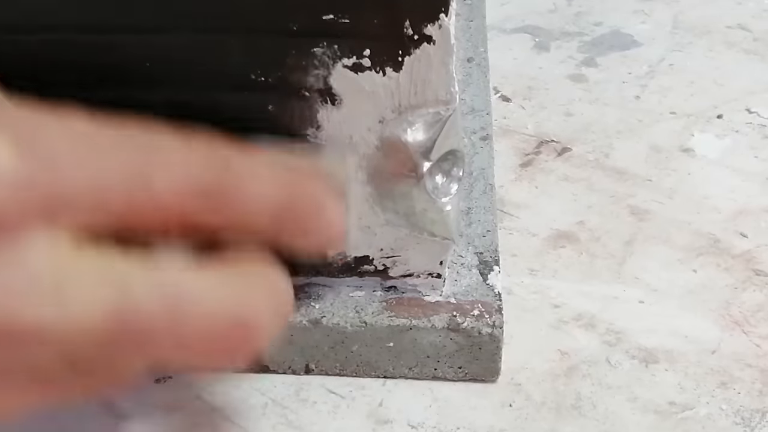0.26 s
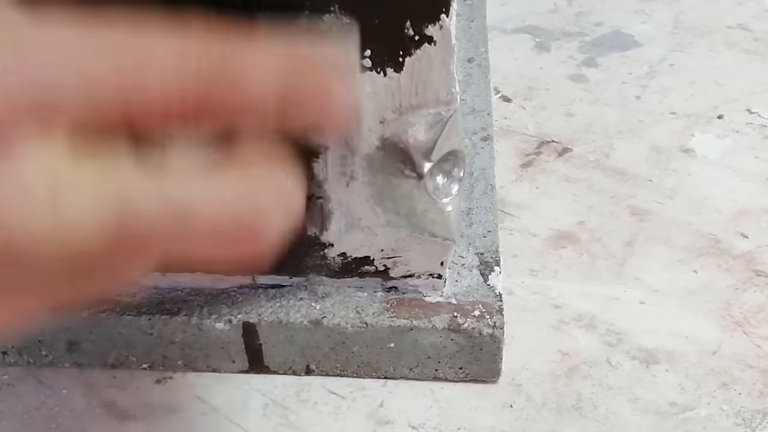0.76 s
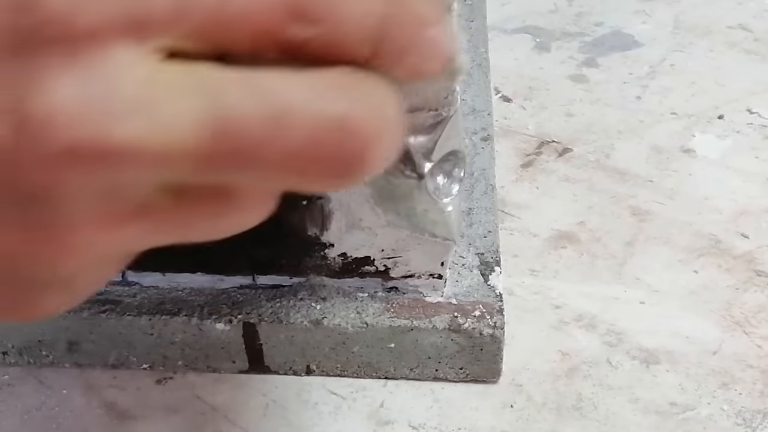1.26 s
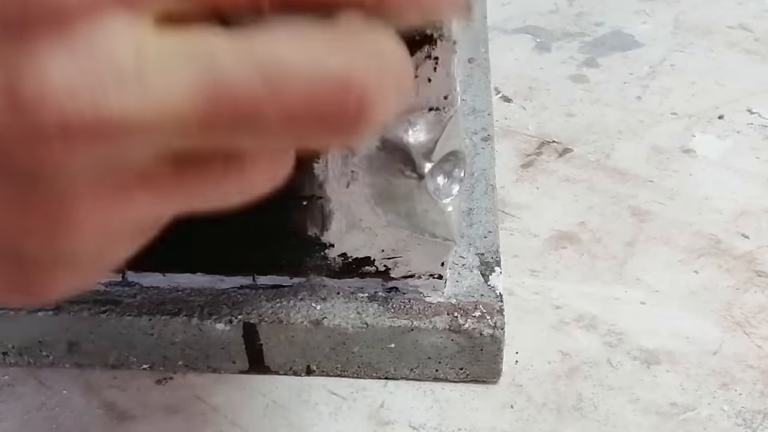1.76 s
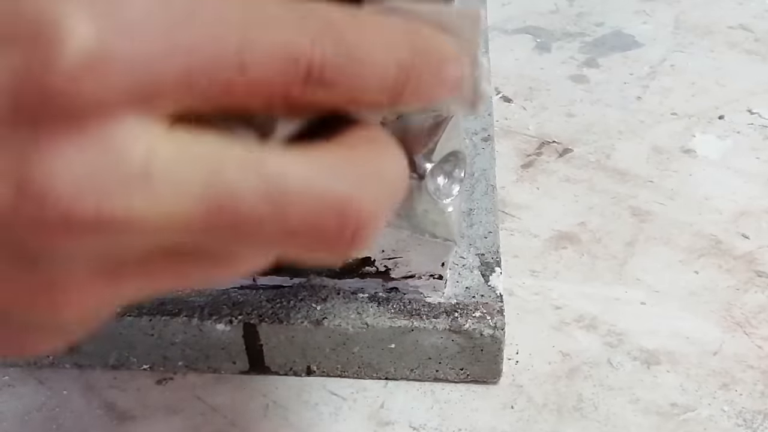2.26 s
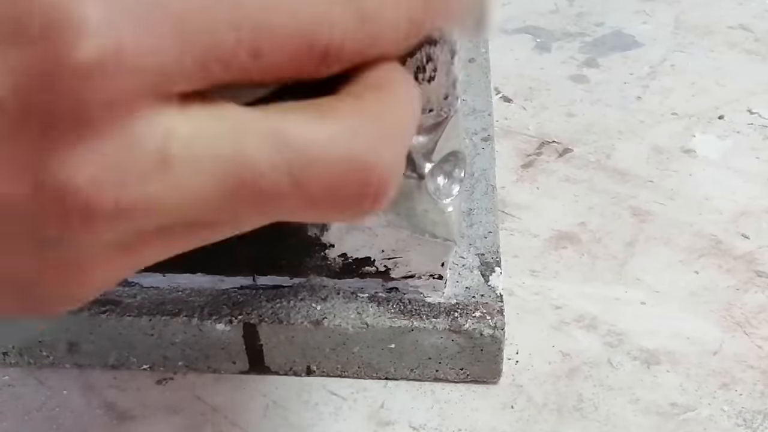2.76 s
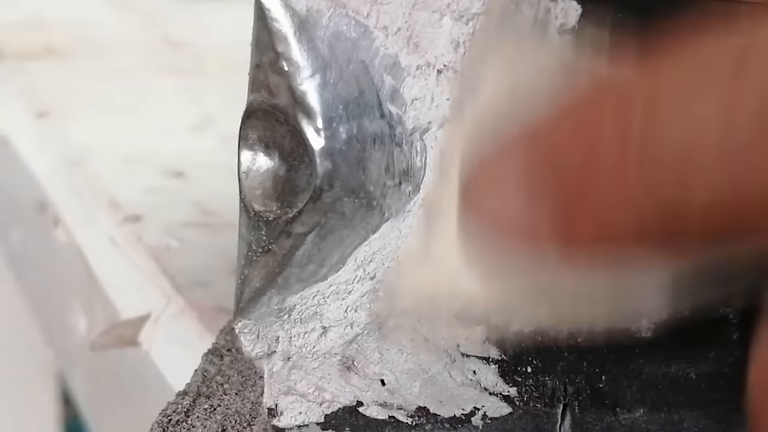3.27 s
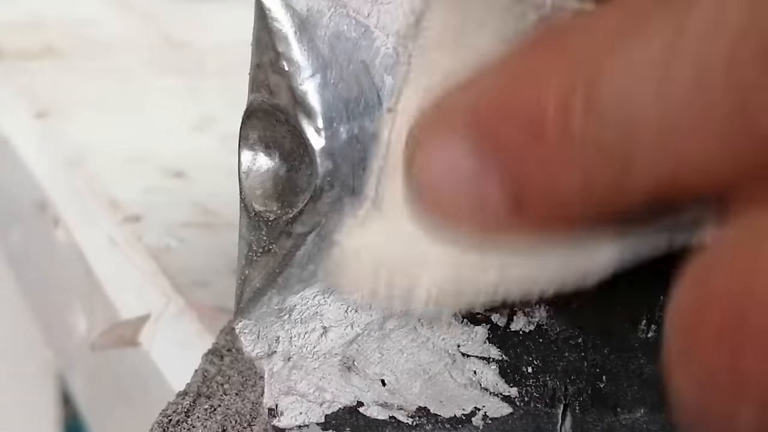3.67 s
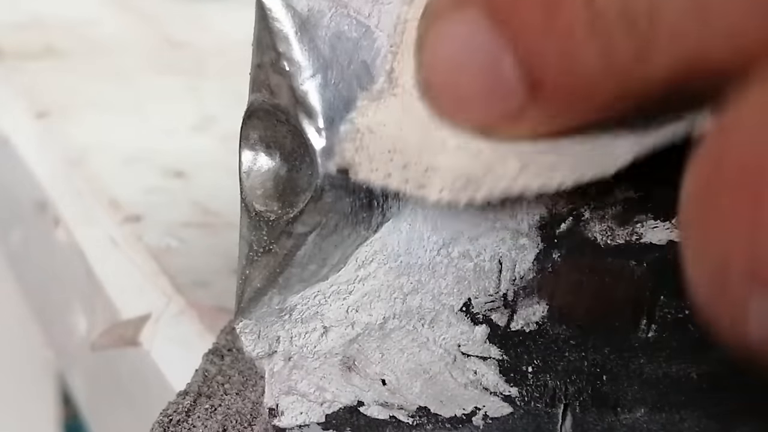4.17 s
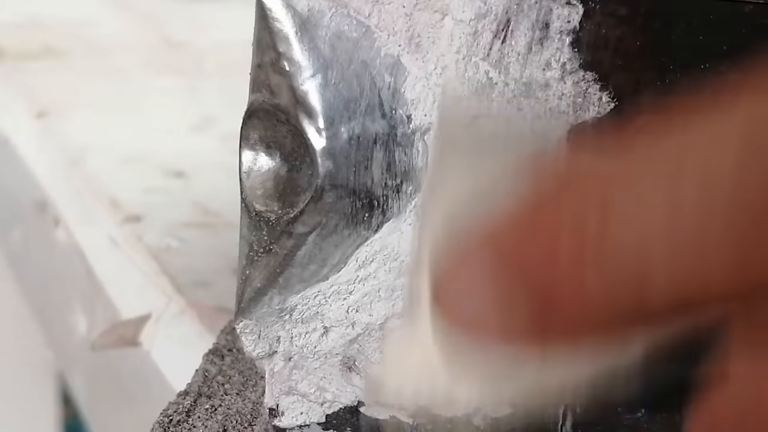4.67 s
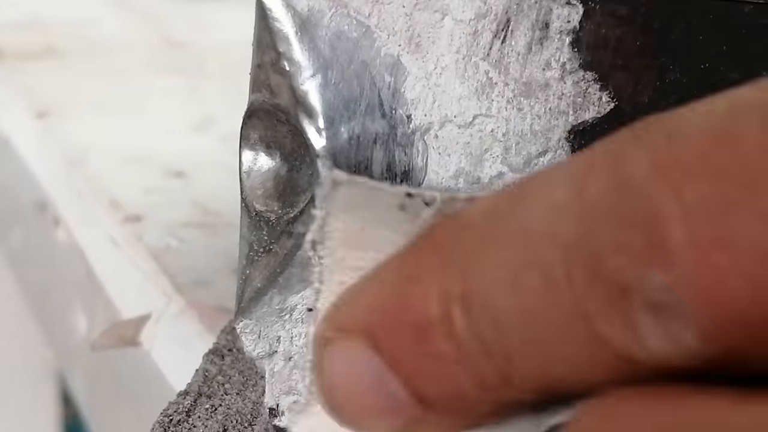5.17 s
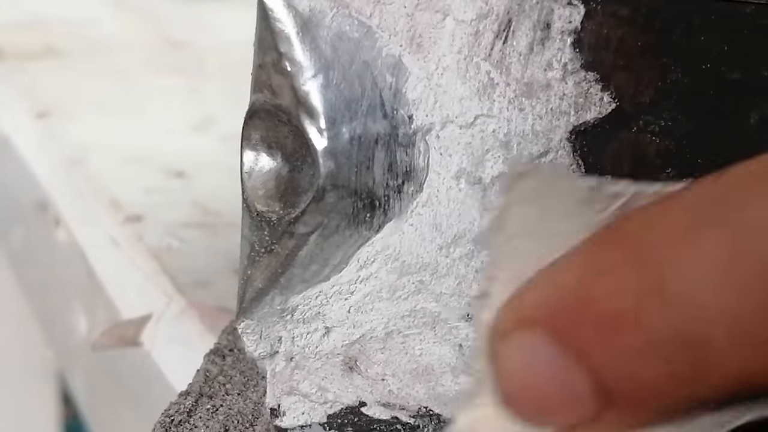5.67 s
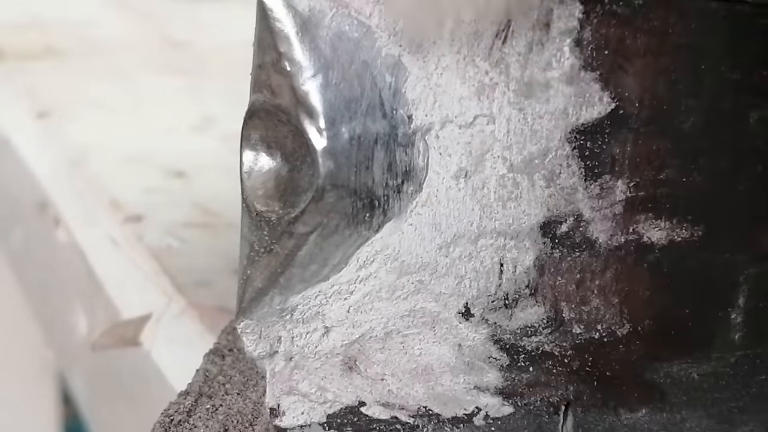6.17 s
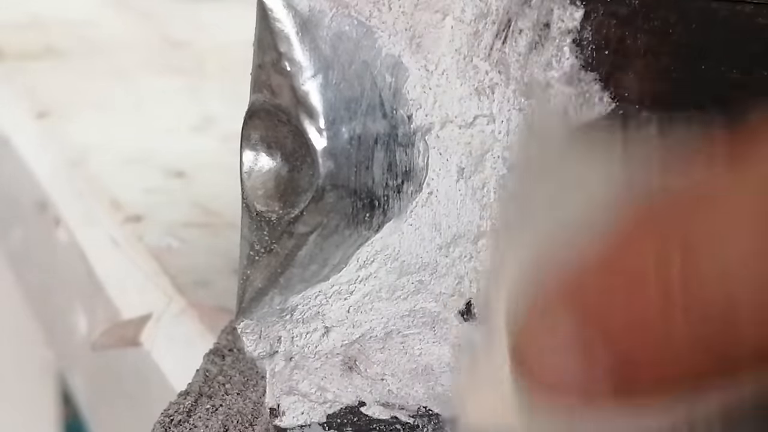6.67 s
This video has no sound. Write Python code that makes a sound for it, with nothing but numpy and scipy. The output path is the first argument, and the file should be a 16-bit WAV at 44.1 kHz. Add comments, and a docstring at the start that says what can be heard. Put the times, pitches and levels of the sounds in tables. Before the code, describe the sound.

Rapid, raspy rubbing of a pad on a painted cement slab, with grains snapping, growing louder and closer partway through.

```python
"""Scrubbing painted cement

Strokes of a cloth pad on rough painted cement follow one another some thirty times a second, close to a two-
port microphone. Each stroke is a burst of friction noise from fibres catching on grit. Loose grains snap,
fingers scuff, the slab hums and the bench rumbles. The rub changes colour as the microphone comes nearer at
about three seconds, then as the pad briefly crosses bare metal and ends along the rim of the paint."""
import sys
import numpy as np
from scipy import signal
from scipy.fft import rfft, irfft, next_fast_len
from scipy.io import wavfile
from scipy.ndimage import uniform_filter1d

SR = 44100
rng = np.random.default_rng(int(sys.argv[2]) if len(sys.argv) > 2 else 0)


def materialize(psi):
    """Save the field psi as 16-bit PCM at rate SR to the path in sys.argv[1].

    A 1-D psi becomes a single channel; in a 2-D psi each row is a channel.
    """
    bounded = np.clip(np.atleast_2d(psi).T, -1, 1)
    quanta = np.round(bounded * 32767).astype(np.int16)
    wavfile.write(sys.argv[1], SR, quanta)


N = 304731

# Each row: time in seconds, bench rumble in dB, left minus right in dB for all the low sounds.
BENCH = [(0, -69, -4), (.52, -66.5, 0.5), (1.0, -81, -2), (1.23, -69, -2.5), (1.45, -74.5, -2.5),
         (2.79, -77.5, -1), (2.9, -68, -6.5), (3.44, -65, -10), (4.0, -67.5, -8.5), (4.81, -67, -8),
         (5.7, -72.5, -7), (6.3, -59.5, -7), (6.5, -69.5, -5), (6.91, -68, -6.5)]


def amp(db):
    """Amplitude ratio of a level in decibels."""
    return 10 ** (np.asarray(db) / 20)


def unit_rms(x):
    """Normalisation to a mean power of one."""
    return x / np.sqrt(np.mean(x ** 2) + 1e-20)


def at_frequency(points, hz):
    """Interpolation on a logarithmic frequency axis."""
    f, value = np.transpose(points)
    return np.interp(np.log(hz + 1), np.log(f + 1), value)


def curves(rows):
    """Linear interpolation of each column over the times in the first."""
    times, *columns = np.transpose(rows)
    return [np.interp(np.arange(N) / SR, times, column) for column in columns]


def filtered(x, gain_of_hz):
    """Linear filtering: the spectrum is multiplied by a frequency response."""
    size = next_fast_len(N)
    return irfft(rfft(x, size) * gain_of_hz(np.fft.rfftfreq(size, 1 / SR)), size)[..., :N]


def pan(pan_db):
    """Constant-power panning: left and right gains for a level difference."""
    ratio = amp(pan_db)
    return np.array([ratio, np.ones_like(ratio)]) * np.sqrt(2 / (1 + ratio ** 2))


def add(mix, start_s, sound):
    """Superposition of a sound on the mix, trimmed at both ends."""
    at = round(start_s * SR)
    sound = sound[..., max(-at, 0):]
    part = mix[..., max(at, 0):][..., :sound.shape[-1]]
    part += sound[..., :part.shape[-1]]


def noise_pair(correlation):
    """Partial coherence: two white noises that share a component."""
    a, b = rng.standard_normal((2, N))
    return np.array([a, correlation * a + np.sqrt(1 - correlation ** 2) * b])


def resonate(x, hz, width_hz):
    """Resonance by heterodyning: hz is shifted to zero, smoothed twice and shifted back."""
    carrier = np.exp(2j * np.pi * np.cumsum(hz * np.ones(N)) / SR)
    pole = np.exp(-np.pi * width_hz / SR)
    return unit_rms((carrier * signal.lfilter([1], [1, -2 * pole, pole * pole], x / carrier)).real)


def swells(rows):
    """Incoherent addition: smooth swells sum in power to give one gain."""
    power = np.zeros(N)
    for centre_s, length_ms, db in rows:
        add(power, centre_s - length_ms / 2000, (amp(db) * np.hanning(int(length_ms * SR / 1000))) ** 2)
    return np.sqrt(power)


def waver(depth_db, smooth_s=0.044):
    """Amplitude modulation by a slow random gain."""
    size = int(smooth_s * SR)
    drift = uniform_filter1d(uniform_filter1d(rng.standard_normal(N), size), size)
    return unit_rms(amp(depth_db * unit_rms(drift)))


def hiss(level_db=-70.5):
    """Stationary noise: a faint hiss, almost uncorrelated between the channels."""
    # Each row: frequency in Hz, relative spectral level in dB.
    spectrum = [(290, -6), (500, -17), (800, -10), (3000, -16.5), (8000, -4), (11000, -11), (15600, -15)]
    return amp(level_db) * unit_rms(filtered(noise_pair(0.084), lambda hz: amp(at_frequency(spectrum, hz))))


def room(x):
    """Reverberation: sparse echoes of random sign, the treble dying first."""
    # Each row: frequency in Hz, time to decay by 60 dB in seconds.
    decay_times = [(1000, 0.4), (4000, 0.11), (8000, 0.094), (15000, 0.1)]
    echoes = np.zeros((2, SR // 2))
    arrivals = np.arange(120, SR // 2 - 20, 20) + rng.integers(0, 20, (2, (SR // 2 - 121) // 20))
    np.put_along_axis(echoes, arrivals, rng.choice([-1., 1.], arrivals.shape), 1)
    hz, t, spectra = signal.stft(echoes, SR, nperseg=128)
    decay = amp(-60 * t / at_frequency(decay_times, hz)[:, None])
    tail = signal.istft(spectra * decay, SR, nperseg=128)[1]
    return signal.fftconvolve(x, tail / np.linalg.norm(tail[0]), axes=1)[:, :N]


def bench_rumble(level_db):
    """Structure-borne sound: the bench rumbles beneath the slab as low, wavering noise."""
    # Each row: frequency in Hz, relative spectral level in dB.
    spectrum = [(12, -20), (30, -5), (100, 0), (280, -3), (500, -18), (900, -60)]
    gain = amp(level_db) * waver(depth_db=3)
    return gain * unit_rms(filtered(noise_pair(0.3), lambda hz: amp(at_frequency(spectrum, hz))))


def slab_hum():
    """Forced vibration: three low modes of the slab hum, and swell as the hand bears down."""
    # Each row: mode frequency in Hz, width in Hz.
    modes = [(285.2, 43.5), (143.7, 16), (70.4, 13.5)]
    # Each row: time in seconds, then each mode's level between presses in dB.
    resting = [(0, -74.5, -93, -84), (1.3, -80.5, -95, -81.5), (2.75, -95, -92, -78),
               (2.9, -70.5, -68, -78), (3.7, -63.5, -88, -80), (4.2, -68, -78, -78), (4.9, -64, -77, -72),
               (5.1, -86, -82, -75), (5.8, -80, -82, -74), (6.0, -76, -78, -80), (6.91, -70, -81, -80)]
    # Each row: centre in seconds, length in ms, then each mode's level in dB.
    presses = [(.04, 80, -70, -76, -91), (.35, 100, -85, -72, -81), (.5, 80, -68, -75, -84),
               (.88, 150, -74, -86, -73), (1.23, 70, -60, -68, -84), (1.83, 100, -66, -93, -79),
               (2.71, 80, -70, -79, -88), (3.05, 201, -61, -64, -82), (3.19, 160, -69, -64, -63.5),
               (3.35, 83.33, -56.5, -82, -75), (3.58, 140, -57, -85, -71), (3.77, 60, -52, -72, -73),
               (3.85, 70, -52.5, -73, -67), (4.1, 100, -66, -73, -69), (4.44, 97.2, -56.5, -72, -74),
               (4.8, 200, -73, -72, -72), (4.91, 70, -62, -74, -69), (5.29, 140, -65.5, -82, -68),
               (5.92, 101.9, -55, -80, -80), (6.12, 74.07, -67, -79, -72), (6.27, 83.33, -65.5, -78, -76),
               (6.39, 74.07, -62, -65, -74), (6.5, 55.56, -66, -71, -82), (6.87, 90, -64, -78, -74)]
    gains = []
    for mode, rest_db in enumerate(curves(resting)):
        pressed = swells([(s, ms, levels[mode]) for s, ms, *levels in presses])
        gains.append(np.hypot(amp(rest_db) * waver(depth_db=3), pressed))
    return sum(gain * resonate(noise_pair(0.56), hz, width) for gain, (hz, width) in zip(gains, modes))


def fingers(brush_hz=417, width_hz=300, skirt_db=-5):
    """Sliding friction: fingers scuff and brush the slab, a dull noise band with a broad skirt."""
    # Each row: centre in seconds, length in ms, level in dB, centre frequency in Hz.
    scuffs = [(0.039, 70, -58, 424), (.11, 95, -66, 406), (.31, 50, -54.5, 445), (.39, 160, -58, 570),
              (0.519, 65, -60.5, 465), (.79, 110, -69, 450), (0.942, 75, -61, 420), (1.06, 130, -63, 394),
              (1.16, 180, -64, 400), (1.24, 60, -62.5, 348), (1.35, 125, -63, 414), (1.46, 66, -67, 375),
              (1.87, 100, -70, 386), (2.44, 115, -63, 445), (2.85, 110, -67, 467), (2.95, 110, -63.5, 524),
              (3.12, 80, -63, 380), (3.31, 40, -58, 375), (3.52, 120, -66, 543), (3.77, 80, -74, 356),
              (3.97, 190, -66.5, 520), (4.12, 140, -60.5, 556), (4.29, 150, -60.5, 462),
              (4.7, 83, -68, 485), (4.85, 80, -68, 575), (5.002, 64, -57, 636), (5.18, 70, -59, 704),
              (5.34, 120, -58.5, 634), (5.87, 130, -66, 433), (6.1, 120, -61, 625), (6.29, 70, -60, 570),
              (6.39, 43, -58, 386), (6.5, 44, -66, 382), (6.66, 100, -66, 504), (6.791, 140, -60.5, 545)]
    # Each row: time in seconds, level of the steady brushing in dB.
    brushing = [(0, -68), (.65, -70), (1.3, -69.5), (1.9, -71), (2.02, -76), (2.35, -74), (2.77, -69.5),
                (2.9, -70.5), (4.8, -69.5), (5.1, -78), (5.9, -68.5), (6.91, -69)]
    skirt = amp(skirt_db) * unit_rms(filtered(noise_pair(0.33), lambda hz: hz / (1 + (hz / 900) ** 2)))
    *_, scuff_hz = curves(scuffs)
    scuff = swells([row[:3] for row in scuffs]) * (resonate(noise_pair(0.76), scuff_hz, width_hz) + skirt)
    brush_gain = amp(curves(brushing)[0]) * waver(depth_db=4)
    return scuff + brush_gain * (resonate(noise_pair(0.39), brush_hz, width_hz) + skirt)


def grit_snaps(crack_ms=0.35, ring_ms=0.8, ring_db=-7.5, low_cut_hz=2500):
    """Impulsive excitation: a grain breaks loose with a broadband crack and a few cycles of ring."""
    # Each row: start in seconds, level before the low cut in dB, ring in Hz, left minus right in dB.
    snaps = [(0.5054, -28, 5190, -10), (0.5157, -40, 8050, 0), (0.9335, -40, 3870, -2.5),
             (0.943, -40, 3400, -3), (1.1328, -37, 7260, 1), (1.2242, -33.5, 5440, -8),
             (1.549, -41, 7500, -1), (1.8034, -41, 7700, 6), (2.131, -30, 7400, 4), (2.3266, -54, 8760, -1),
             (2.358, -44, 6860, 5), (2.438, -46, 6580, 5), (3.461, -17.5, 6100, -1),
             (3.5385, -24, 7100, -4.5), (3.5886, -28, 7160, -5), (4.0976, -25, 8800, 3),
             (4.1615, -28, 6550, 3), (4.193, -14, 8800, -14), (4.2035, -15, 6400, -7),
             (4.219, -27, 5450, -5.5), (4.8188, -26, 4250, -10), (4.827, -34, 7400, 0),
             (5.0304, -29, 9000, -18), (5.2094, -29, 7450, 7), (5.3144, -23, 3410, -15),
             (5.3994, -21.5, 7700, 12), (5.484, -25, 3450, -24), (5.4944, -32, 5400, -17),
             (5.5004, -31, 7320, -2), (5.5653, -30, 7400, 5), (5.5814, -25, 8100, -7),
             (5.5877, -22, 9000, -12), (5.657, -25, 7610, -1), (5.6669, -18, 8150, -3),
             (5.968, -21, 6450, 4), (5.9727, -17, 3500, -6), (6.007, -18.5, 4730, -3),
             (6.017, -30, 4100, -7), (6.0383, -20, 7540, -10), (6.046, -30, 4720, 2),
             (6.106, -29, 4050, -9), (6.2119, -8.5, 4170, -6), (6.255, -14, 5700, -10),
             (6.272, -17, 4530, -11), (6.2874, -27, 7340, -1), (6.3595, -25, 4700, -1),
             (6.432, -17.5, 5900, -6), (6.4452, -18.5, 6960, 9), (6.4924, -33, 6090, -4),
             (6.498, -18, 5300, 10), (6.821, -26, 7000, -3.5)]
    out, t = np.zeros((2, N)), np.arange(400) / SR
    ring_age = t * 1000 / ring_ms
    for start_s, db, hz, pan_db in snaps:
        noise = rng.standard_normal((2, len(t)))
        ring = amp(ring_db) * np.sin(2 * np.pi * hz * t) * ring_age * np.exp(1 - ring_age ** 2)
        crack = np.diff(noise[0] + 0.5 * noise, prepend=0)
        crack *= np.exp(-t * 1000 / crack_ms) * np.minimum(t * 8000, 1)
        crack /= abs(crack).max(axis=1, keepdims=True)
        add(out, start_s, amp(db) * pan(pan_db)[:, None] * (ring + crack))
    return filtered(out, lambda hz: 1 / (1 + (low_cut_hz / (hz + 1)) ** 4))


def fibre_pressure(flutter_db=3, catches_per_s=900, spread_db=3.5, catch_db=-11):
    """Stick-slip: pressure on the weave flutters, and single fibres catch for half a millisecond."""
    flutter = amp(flutter_db * unit_rms(uniform_filter1d(rng.standard_normal(N), size=110)))
    strength = amp(spread_db * np.minimum(rng.exponential(1, N), 3))
    catches = strength * (rng.random(N) < catches_per_s / SR)
    return unit_rms(flutter) + amp(catch_db) * unit_rms(uniform_filter1d(catches, size=20))


def rough_surface(x, depth_db=3):
    """Spectral modulation: each stretch of surface favours other resonances for some ten milliseconds."""
    spectra = signal.stft(x, nperseg=256, noverlap=192)[2]
    patches = rng.standard_normal(spectra.shape[:0:-1])  # time by frequency
    patches = uniform_filter1d(uniform_filter1d(patches, size=7, axis=0), size=6, axis=1)
    spectra *= amp(depth_db * unit_rms(patches).T)
    return unit_rms(signal.istft(spectra, nperseg=256, noverlap=192)[1][:, :N])


def stroke_gains(speed_exponent=2.66, ordinary_db=-40, drag_s=0.02):
    """Friction noise grows as a power of pad speed: stereo gains of the body, low, middle and top bands."""
    # Each row: moment of full speed in seconds, rise in ms, fall in ms, level in dB,
    # dullness as extra dB in the low band.
    strokes = [(0.026, 67, 31, -41, 1.5), (0.06, 24, 26, -39.5, -1), (0.092, 25, 35, -41.5, 0.0),
               (0.131, 28, 20, -39.5, 0), (0.163, 24, 30, -40.5, 1), (0.198, 26, 26, -40.5, 0.0),
               (0.23, 19, 31, -40, 1), (0.26, 24, 37, -43, -2.5), (0.298, 25, 27, -43, 2),
               (0.33, 28, 52, -49.5, -6), (0.438, 28, 18, -53.5, -1), (0.472, 38, 28, -52, -4),
               (0.507, 6.9, 5.4, -38.5, 15), (0.535, 57, 21, -39, -2.5), (0.569, 24, 31, -40.5, -5),
               (0.614, 44, 25, -42, -2), (0.646, 15, 26, -39.5, 2), (0.682, 34, 30, -42, 2),
               (0.717, 20, 29, -38.5, 0.5), (0.757, 45, 34, -44.5, -2), (0.79, 24, 31, -44, 1.5),
               (0.822, 32, 35, -43, -0.5), (0.872, 57, 51, -46, -4), (0.933, 46, 38, -50.5, 1),
               (0.969, 24, 32, -47.5, 0), (1.022, 45, 34, -48.5, 2), (1.062, 25, 35, -47.5, 1),
               (1.111, 30, 31, -45.5, 2), (1.159, 39, 42, -47.0, -3), (1.221, 49, 22, -43.5, -1.5),
               (1.254, 20, 41, -44.5, -1.0), (1.313, 49, 44, -48.5, 1), (1.359, 36, 28, -49, 5),
               (1.394, 28, 54, -50, 0), (1.452, 22, 25, -49.5, -0.5), (1.48, 19, 43, -45, -1),
               (1.527, 20, 14, -49.5, -4), (1.553, 16, 28, -51, 1), (1.586, 16, 14, -52.0, 2),
               (1.624, 28, 15, -49, -1.5), (1.652, 21, 19, -49.0, 1), (1.683, 17, 19, -49.5, -1.0),
               (1.717, 25, 13, -51, 2.5), (1.744, 13, 18, -45, 4), (1.777, 22, 24, -48.5, 0),
               (1.807, 16, 26, -47, 2), (1.844, 24, 16, -47.5, 2), (1.869, 18, 23, -45, 3),
               (1.903, 20, 23, -51.5, 1.5), (1.935, 26, 17, -48.5, -2.0), (1.965, 20, 14, -51.5, -9),
               (2.142, 22, 14, -44.5, 8), (2.245, 13, 30, -41.5, 2), (2.36, 22, 21, -45.5, 0.5),
               (2.458, 16.5, 26, -43.5, 2.5), (2.587, 35, 33, -47.5, -0.5), (2.695, 29, 22, -45, 2.5),
               (2.82, 34, 14, -45, 2), (2.854, 13, 18, -45.5, 6), (2.895, 11, 10, -44, -6),
               (2.92, 15, 22, -40.5, -2), (2.959, 17, 16, -38.5, 0.5), (2.993, 23, 21, -43, 3),
               (3.022, 16, 19, -40, -1.0), (3.052, 15, 25, -39.5, -13), (3.083, 14, 17, -42.5, -5),
               (3.117, 14, 14, -51.5, -14), (3.148, 10.5, 16, -35.5, -5), (3.181, 23, 22, -40.5, 1.5),
               (3.213, 14, 15, -34, 2.5), (3.249, 16, 16, -36, 2), (3.287, 19, 15, -35, 4),
               (3.317, 12, 18, -37, 2.0), (3.354, 15, 22, -34.0, -7), (3.389, 18, 16, -35.5, -1),
               (3.423, 14, 25, -36.5, 2), (3.463, 21, 7, -28, -3), (3.494, 24, 34, -38.5, 4.5),
               (3.536, 26, 16, -38, 6), (3.569, 23, 15, -37.5, 2), (3.601, 14, 9.2, -24.5, -3.5),
               (3.63, 11, 11, -36.5, 2), (3.664, 10.8, 8, -22, -0.5), (3.696, 9.5, 18, -37, -9),
               (3.731, 10, 12, -26, -17), (3.765, 15, 15, -39, 3), (3.792, 11.7, 10.5, -23.5, 0.5),
               (3.83, 17, 17, -34, -2), (3.865, 21, 18, -48, -8), (3.895, 26, 19, -38.5, 1),
               (3.931, 18, 13, -42, -17), (3.969, 24, 23, -46, -11), (3.995, 18, 16, -37, 3),
               (4.032, 20, 12, -36, 0), (4.059, 14, 19, -40.5, -4), (4.096, 18, 8, -33.5, 1.5),
               (4.124, 22, 38, -41.5, 2), (4.164, 11, 9.9, -42.5, 7), (4.194, 15, 9.5, -26, -4),
               (4.225, 13, 50, -52, -21), (4.264, 15, 16, -36.5, -6), (4.295, 15, 28, -39.5, 3),
               (4.33, 22, 29, -36, 4), (4.365, 19, 14, -35, 0.5), (4.394, 18, 41, -42, 7),
               (4.427, 19, 23, -34.5, 2), (4.457, 15, 15.5, -27.5, -2), (4.488, 12, 18, -35.5, -2),
               (4.563, 16, 20, -42.0, -23), (4.591, 19, 13, -44, -18), (4.623, 21, 12, -34.5, -7),
               (4.651, 17.5, 18, -36, 1.5), (4.684, 14, 20, -35.0, 10.5), (4.718, 17, 11, -34.5, 7),
               (4.748, 12, 21, -35, 3.5), (4.782, 21, 16, -41.5, 0.0), (4.817, 16, 12, -36.5, 13),
               (4.843, 12.6, 13, -31, 8), (4.879, 13.5, 11.5, -33, 5), (4.934, 20, 17, -57, -8),
               (4.968, 21, 24, -52, -28), (5.024, 39, 22, -45, -10), (5.065, 24, 23, -48, -6),
               (5.114, 40, 16, -40, 6), (5.148, 27, 39, -42, -9), (5.205, 36, 26, -37.5, 8),
               (5.244, 24, 31, -41, 1), (5.301, 35, 39, -40.5, 4), (5.347, 42, 33, -44.5, -2),
               (5.4, 31, 30, -37.5, 10), (5.444, 37, 28, -43.5, 4), (5.487, 24, 24, -36, -3.5),
               (5.525, 19, 43, -45.5, 5), (5.577, 21, 19, -37.0, -5), (5.623, 25, 23, -43, -1),
               (5.667, 24, 11, -34.5, -2), (5.706, 29, 41, -46, -1), (5.747, 15, 15, -38, -3),
               (5.783, 26, 18, -52, -9), (5.824, 23, 17, -35.5, -4), (5.856, 13, 12, -34, -1),
               (5.895, 20, 22, -35.5, -2), (5.926, 7.5, 9, -36.0, -2), (5.969, 22, 11.5, -25, -2.5),
               (6.009, 11, 23, -34.5, 6.0), (6.042, 13, 28, -38, 3), (6.083, 15, 4, -30, 1),
               (6.111, 9.1, 12.4, -34, 5), (6.16, 21, 12, -45.5, -11), (6.189, 26, 31, -36.0, 6),
               (6.213, 7, 6.8, -26.5, 8), (6.226, 11, 16, -33, -10), (6.258, 17, 22, -30.5, 5),
               (6.291, 15, 25, -38.5, 4), (6.322, 11.6, 18, -29, 4), (6.358, 12, 13, -36, -10),
               (6.379, 25, 25, -36, -4), (6.409, 26, 25, -44, -1), (6.435, 9.9, 10, -28.5, -5),
               (6.455, 7.3, 8.7, -37, -12), (6.497, 8.2, 5.9, -28, 0.5), (6.564, 30, 25, -47.5, 5),
               (6.595, 34, 24, -46.0, -4), (6.653, 15, 15, -38.0, -1), (6.684, 14, 24, -37.5, 1.5),
               (6.723, 17, 14, -36, -1), (6.751, 12.4, 16, -33.5, -1), (6.784, 10, 12, -35.5, 1),
               (6.814, 15, 21, -33.5, -1), (6.851, 22, 21, -38, 5.5), (6.886, 19, 14, -34.5, 1)]
    # Each row: time in seconds, body band of an ordinary stroke in dB, low and top bands
    # relative to the middle in dB, left minus right in dB.
    tone = [(0, -56, -2, 6.5, -2.5), (.29, -54.5, -1.5, 5, -3.5), (.4, -48.5, 13, -2, 0),
            (.45, -56, 2, 6.5, -3.5), (.72, -61, 0, 9, -3), (1.0, -57.5, 0, 13, -2),
            (1.5, -61, -3, 8, -2.5), (1.7, -58.5, -7, 4, -3.5), (1.95, -60.5, -10.5, 2, -3),
            (2.14, -64, -10, 0.5, -3), (2.8, -63, -10, 1, -4), (2.92, -53, -10, 4, -3),
            (3.3, -52.5, -8, 3, -2.5), (3.75, -55.5, -5.5, 3.5, -4), (4.1, -53.5, -9.5, 3.5, -3.5),
            (4.5, -54.5, -10.5, 3, -2), (4.95, -58, -18.5, 0.5, -4), (5.15, -50.5, -17, 6, -5.5),
            (5.64, -53, -4, 7, -6), (5.78, -56, -18, -5, 0), (5.98, -45.5, 0, -0.5, -8),
            (6.2, -52.5, -1.5, -1, -9.5), (6.42, -50.5, 1, 3.5, -6), (6.56, -61.5, -7, 5.5, -4.5),
            (6.91, -58, -12.5, -5, -2.5)]
    tone_curves, power = np.array(curves(tone)), np.zeros((4, 2, N))
    for peak_s, rise_ms, fall_ms, db, dull_db in strokes:
        top_scatter, pan_scatter = rng.standard_normal(2)
        body_db, low_db, top_db, pan_db = tone_curves[:, min(round(peak_s * SR), N - 1)]
        rise, fall = (np.linspace(0, np.pi / 2, int(ms * SR / 1000)) for ms in (rise_ms, fall_ms))
        speed = np.concatenate([np.sin(rise), abs(np.cos(fall))])
        body = amp(body_db + 0.27 * dull_db + 0.54 * (db - ordinary_db))
        upper = amp([low_db + dull_db, 0, top_db + 0.1 * dull_db + 0.1 * top_scatter])
        bands = np.append(body, amp(db) * upper / np.linalg.norm(upper))
        burst = bands[:, None, None] * pan(pan_db + 0.9 * pan_scatter)[:, None] * speed ** speed_exponent
        add(power, peak_s - len(rise) / SR, burst ** 2)
    body_db, _, _, pan_db = tone_curves
    power[0] += (amp(body_db - 13) * pan(pan_db)) ** 2  # the body band never quite stops
    # The pad drags on lightly after each stroke, and more faintly into it.
    drag_bands_db, lead_in_db = (-6.5, -8, -17, -18.5), -8
    pole = np.exp(-1 / (drag_s * SR))
    after = signal.lfilter([1 - pole], [1, -pole], power)
    before = signal.lfilter([1 - pole], [1, -pole], power[..., ::-1])[..., ::-1]
    drag = (after + amp(lead_in_db) ** 2 * before) * amp(drag_bands_db)[:, None, None] ** 2
    return np.sqrt(power + drag)


def pad_rub(band_edges_hz=(2600, 5200, 9500)):
    """Source and filter: friction noise, coloured by the place, in four bands that each stroke weights."""
    # Spectral shape within the bands: paint from afar, paint from nearby, bare metal, the paint's rim.
    # Each row: frequency in Hz, relative level in dB.
    far = [(410, -46), (700, -13), (1100, -16.5), (1200, -12), (1540, -14.5), (2170, -4), (2380, -6),
           (3000, -3), (3330, 1), (4770, 2), (5220, 3), (7390, 8), (12400, 7), (15200, 3.5)]
    near = [(410, -27), (700, -19), (991, -21), (1770, -17.5), (2170, -16), (2410, -4.5), (2670, -13),
            (2920, -1.5), (4140, 4), (5150, -1), (7200, 4), (8190, -2), (11700, -3), (13200, -10.5),
            (15200, -7.5)]
    metal = [(410, -24.5), (700, -16), (1080, -19.5), (1300, -5), (1680, -14.5), (2740, -3), (3330, -5.5),
             (4190, 1), (5220, -4), (6170, 1), (6750, -1.5), (7490, 3), (11700, -3.5), (15200, -7)]
    rim = [(410, -37), (700, -26.5), (766, -30), (1640, -33.5), (2410, -26), (2640, -25), (2960, -15),
           (4890, -11.5), (7020, 1), (8510, -9.5), (11400, -9), (12700, -16), (15200, -17)]
    # Each row: frequency in Hz, left minus right in dB before the channels are levelled.
    far_balance = [(60, -6), (99, -31), (160, -14), (270, -16), (450, 8), (740, 11.5), (1220, 5.5),
                   (2010, 8), (3330, 3.5), (5500, 1.5), (9080, 4.5), (15000, 0)]
    near_balance = [(60, -1), (92, -26), (140, 10), (210, 9), (330, 9), (500, -4.5), (770, -6), (1170, -4),
                    (1790, -7.5), (2740, -4.5), (4190, -1), (6410, 1), (9810, -13.5), (15000, 1)]
    metal_balance = [(60, -1), (110, -5.5), (200, -1), (380, 0), (700, -1), (1290, -5.5), (2380, -1.5),
                     (4400, -2), (8120, -7), (15000, -5)]
    # Each row: spectrum, balance, left-right correlation, left delay in ms, roughness exponent.
    places = [(far, far_balance, 0.18, -0.035, 0.61), (near, near_balance, 0.19, 0.013, 0.84),
              (metal, metal_balance, 0.29, 0.036, 1.17), (rim, near_balance, 0.37, -0.016, 0.91)]
    # Each row: start and end of one place's turn in seconds.
    spans = [(0, 2.87), (2.87, 5.92), (5.92, 6.55), (6.55, 7)]

    def crossover(hz):
        """Complementary bands are the differences of successive low-pass responses."""
        low_passes = [1 / (1 + (hz / edge) ** 8) for edge in band_edges_hz]
        return np.diff([np.zeros_like(hz), *low_passes, np.ones_like(hz)], axis=0)[:, None]

    pressure, gains = fibre_pressure(), stroke_gains()
    out, t = np.zeros((2, N)), np.arange(N) / SR
    for (start_s, end_s), (spectrum, balance, correlation, delay_ms, roughness) in zip(spans, places):
        def to_ports(hz):
            """Transfer function to the two ports, which differ in level and arrival time."""
            colour = amp(at_frequency(spectrum, np.minimum(hz, 15200)))
            delay = np.exp(-2j * np.pi * hz * delay_ms / 1000 * np.array([[1], [0]]))
            return colour * pan(at_frequency(balance, hz)) * delay

        friction = rough_surface(noise_pair(correlation) * pressure ** roughness)
        left, right = filtered(friction, to_ports)
        bands = filtered(np.array([unit_rms(left), unit_rms(right)]), crossover)
        for band, gain in zip(bands, gains):
            out += unit_rms(band) * gain * ((t >= start_s) & (t < end_s))
    return out


def scene():
    """Superposition of the scrubbing, its reverberation, the low sounds and the hiss."""
    scrubbing = pad_rub() + grit_snaps()
    background = hiss()
    reverberation = amp(-10.5) * room(scrubbing)
    rumble_db, pan_db = curves(BENCH)
    low_sounds = pan(pan_db) * (slab_hum() + fingers() + bench_rumble(rumble_db))
    return scrubbing + reverberation + low_sounds + background


def record(dry):
    """Band limiting: the recorder acts as a steep low-pass filter."""
    cutoff_hz = 15850
    low_pass = signal.firwin(511, cutoff_hz, window=("kaiser", 9), fs=SR)
    return signal.oaconvolve(dry, low_pass[None], "same")


dry = scene()
out = record(dry)
materialize(out)
```